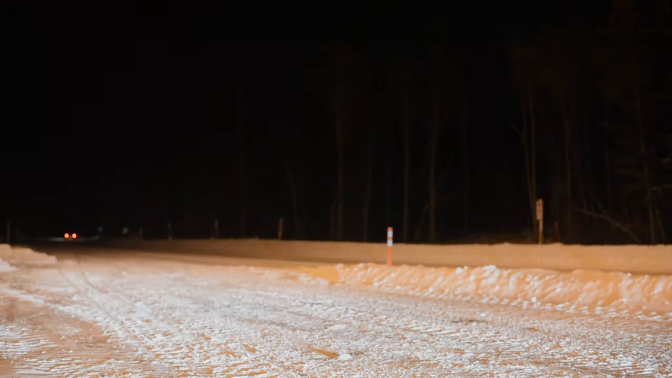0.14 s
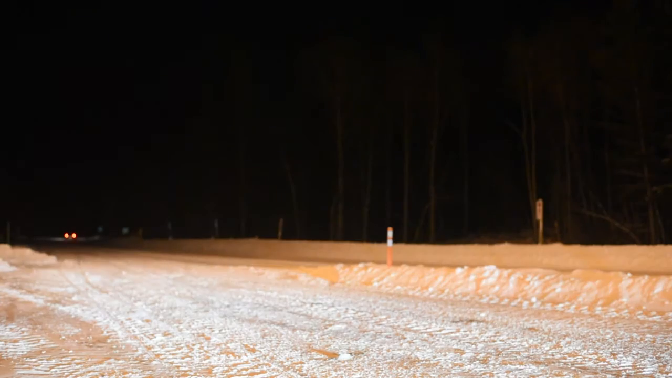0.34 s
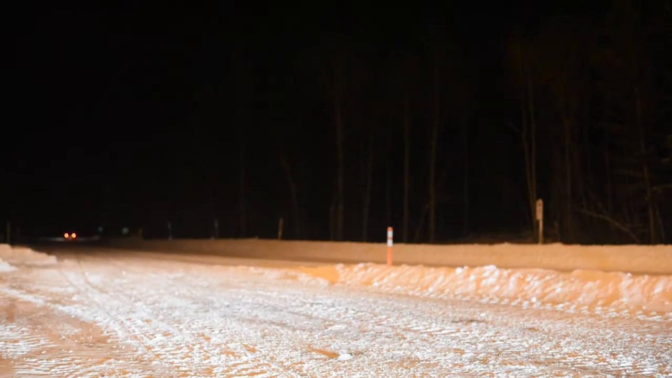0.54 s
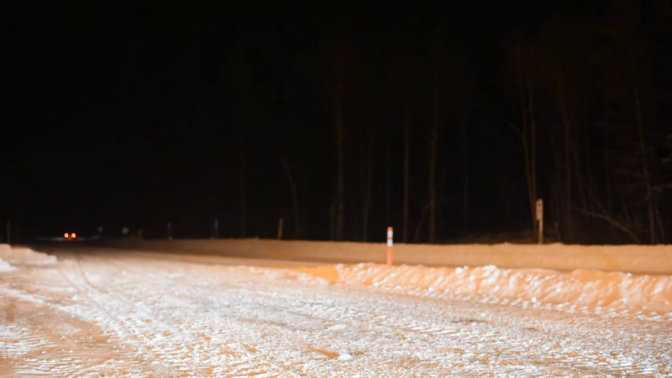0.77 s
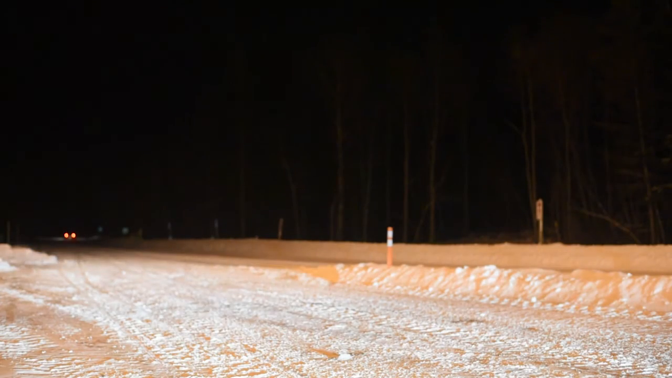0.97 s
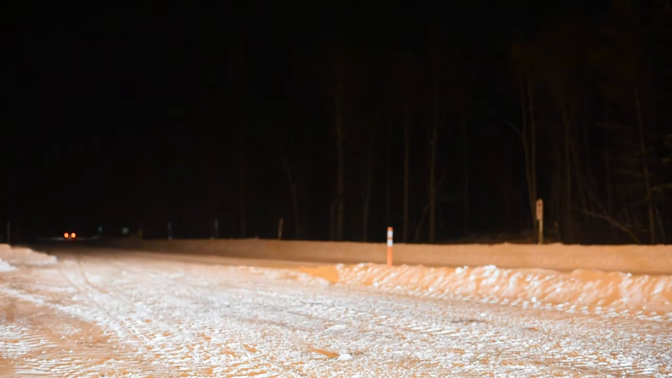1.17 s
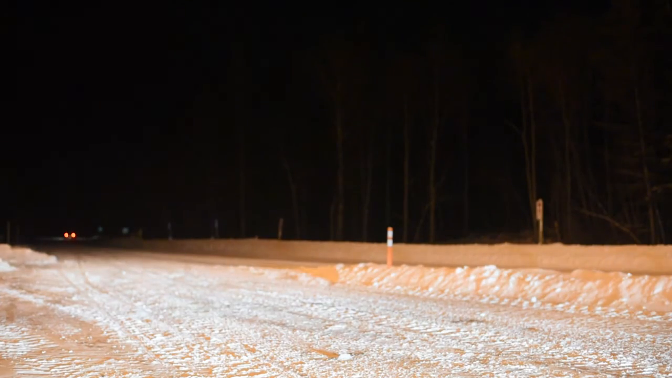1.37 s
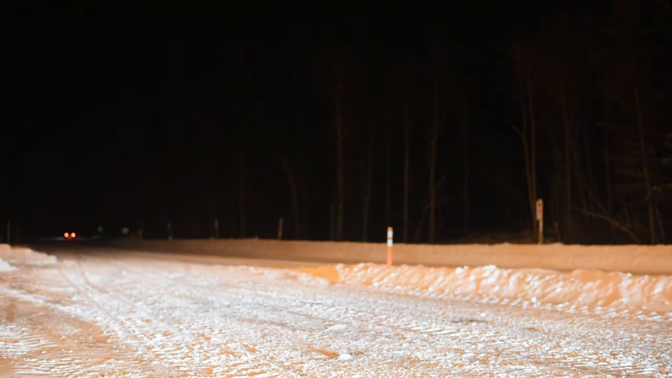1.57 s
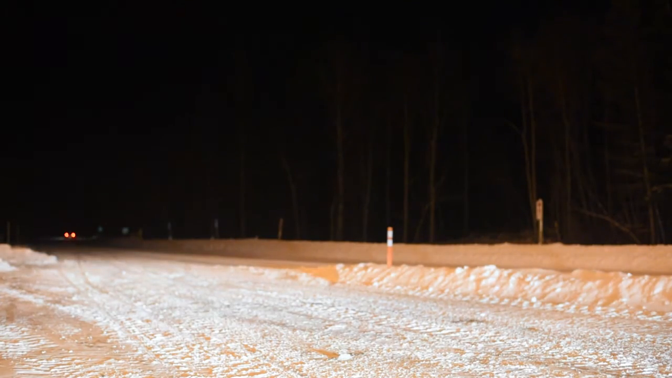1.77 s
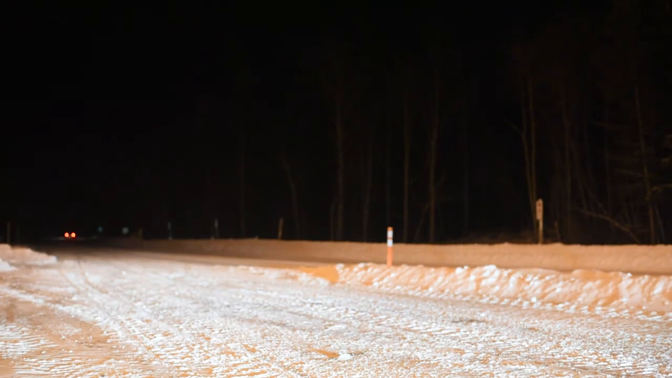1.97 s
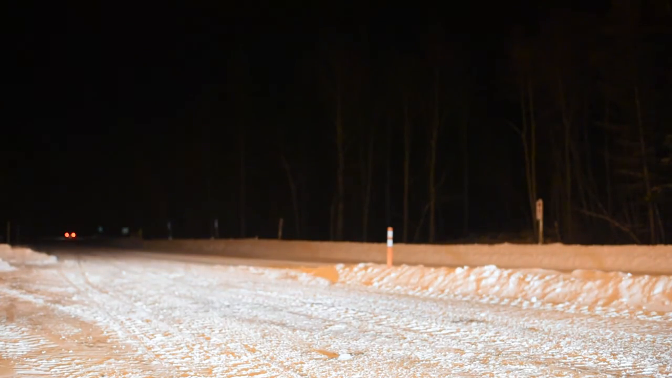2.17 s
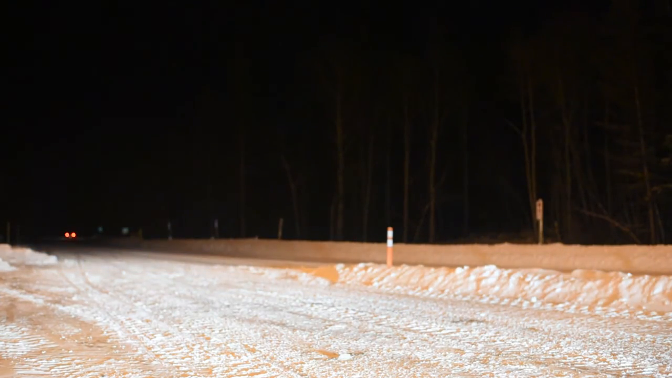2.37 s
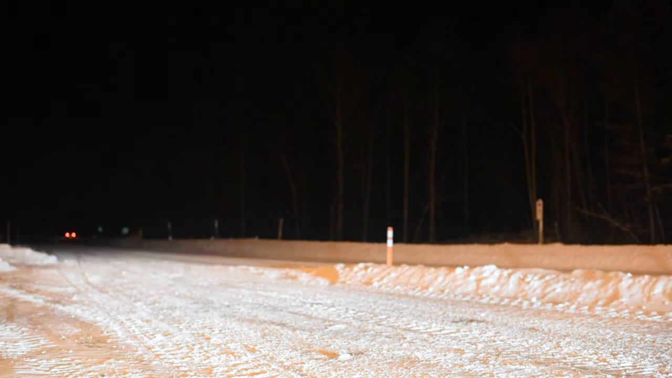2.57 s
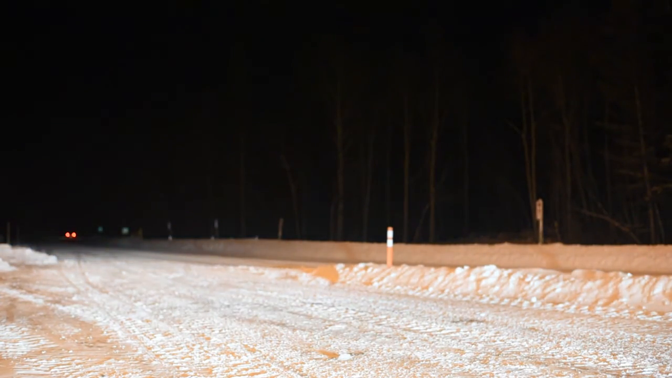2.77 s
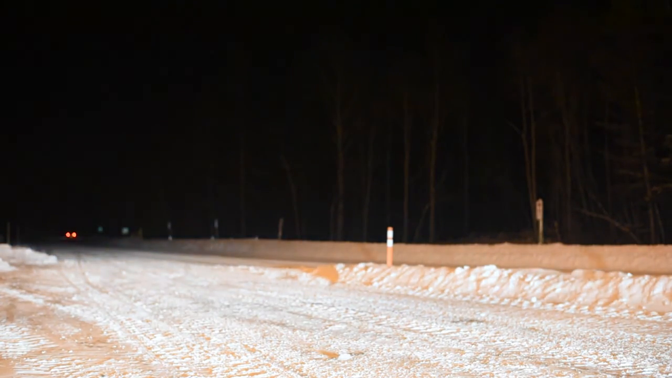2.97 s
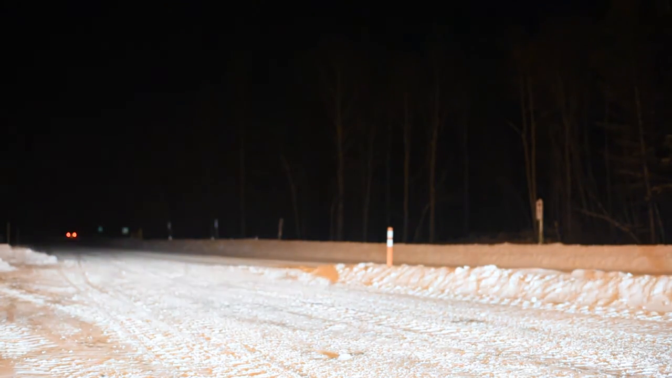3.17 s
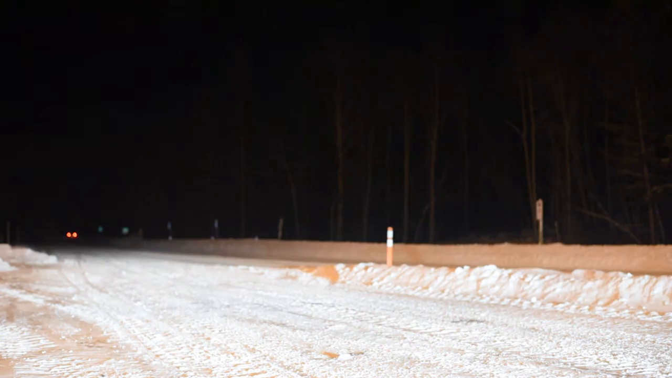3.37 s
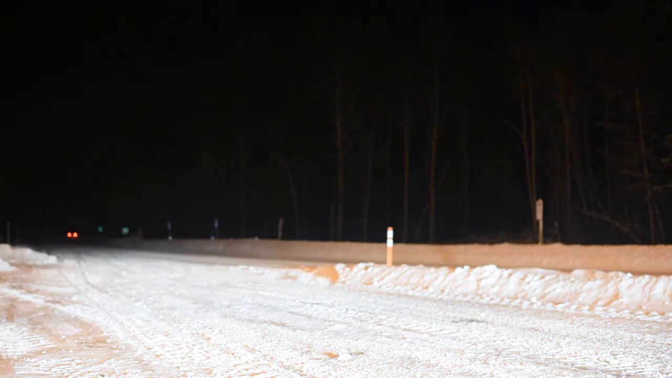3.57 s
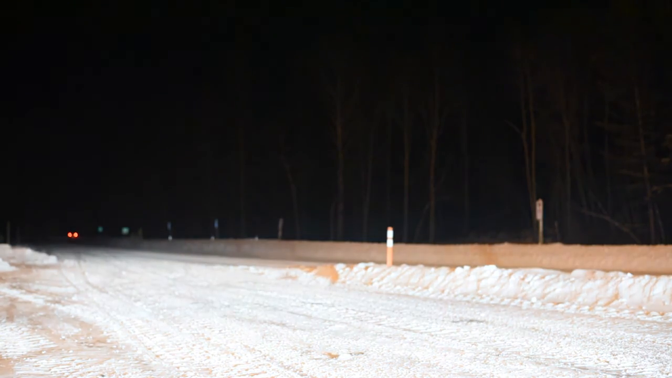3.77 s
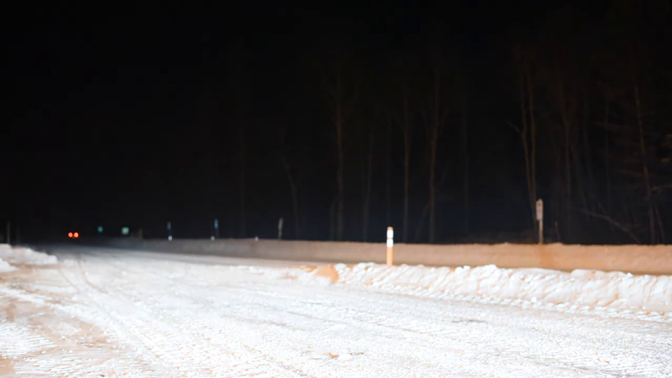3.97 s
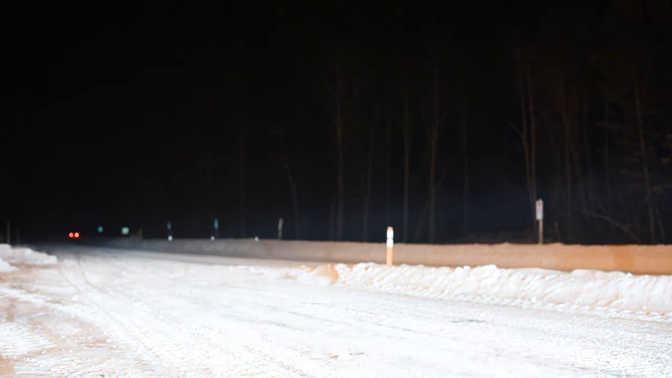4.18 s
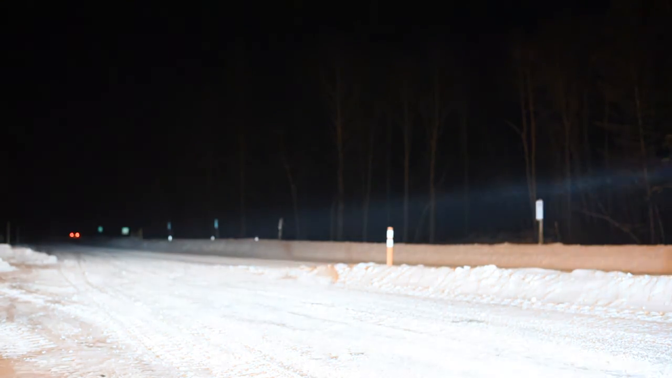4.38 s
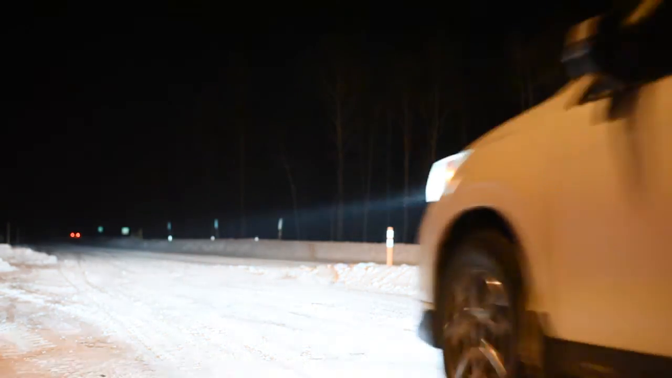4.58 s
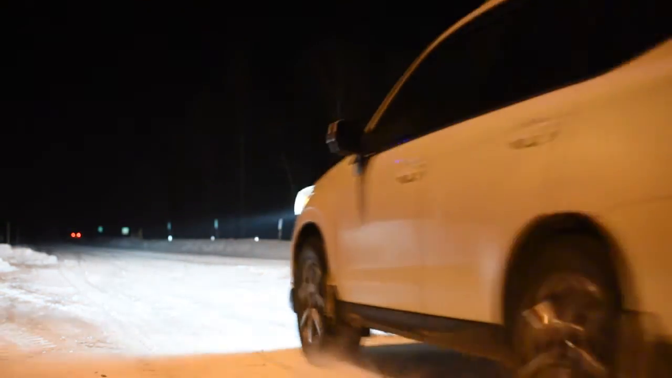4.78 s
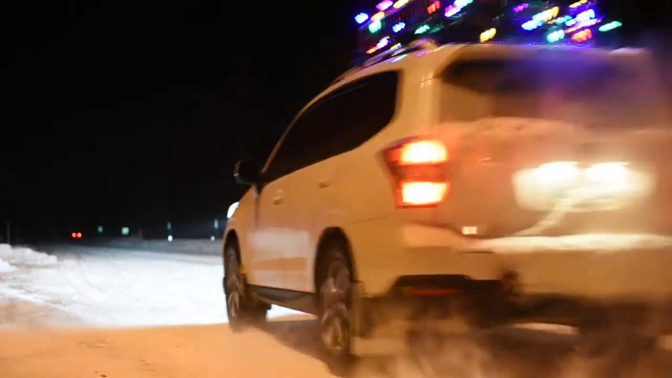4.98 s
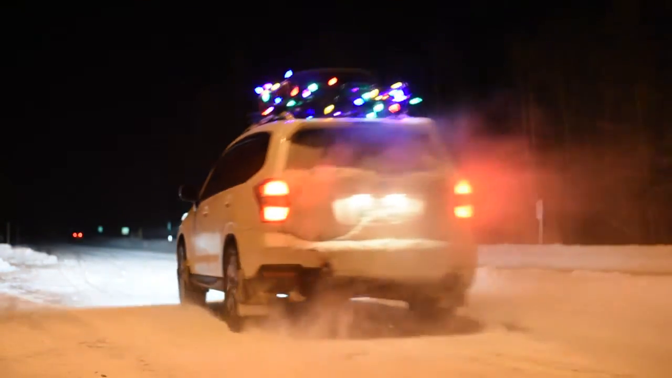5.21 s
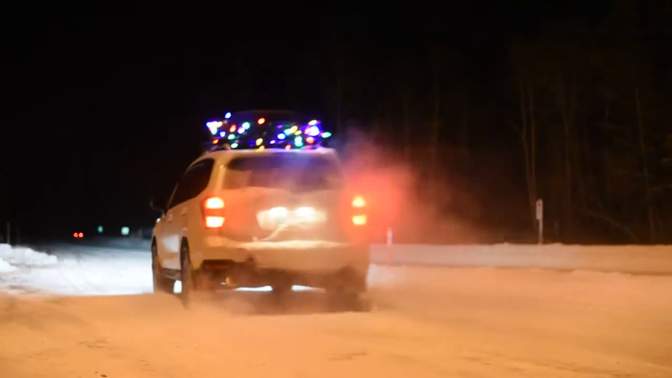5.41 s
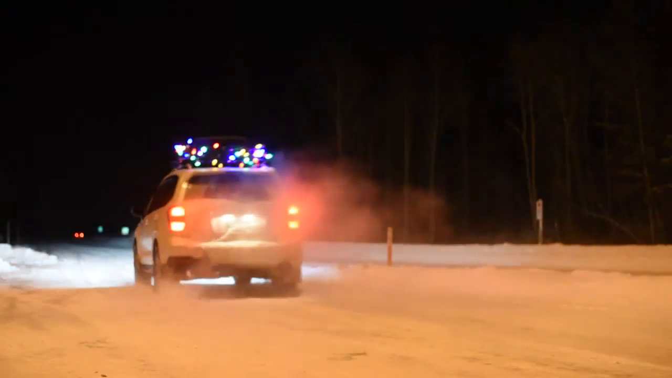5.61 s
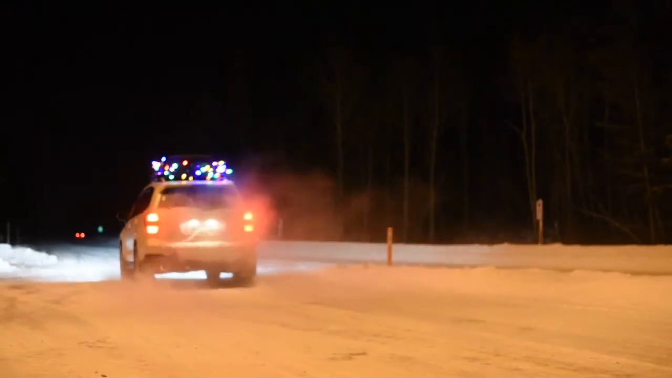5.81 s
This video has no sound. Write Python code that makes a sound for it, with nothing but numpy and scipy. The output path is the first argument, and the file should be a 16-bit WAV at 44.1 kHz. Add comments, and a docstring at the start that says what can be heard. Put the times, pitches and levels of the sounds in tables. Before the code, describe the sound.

A throaty four-cylinder exhaust climbs from a low throb, snow hiss and ice cracks swell beside the microphone, then a raspy bark recedes.

```python
"""A turbocharged four-cylinder car pulls away behind and to the right on packed snow, passes, drives off ahead.
The exhaust booms on multiples of the firing rate; sharp blows ring pipe modes as a bark, gas flow rushes.
Tyre roar and hiss are coloured noise; ice cracks and dry ticks are decaying sines; the turbine whistles.
A murmur of the night road lies beneath. Two microphone ports on a camera body hear the car's bearing."""
import sys
import numpy as np
from scipy import signal
from scipy.io import wavfile
from scipy.ndimage import uniform_filter1d

SR = 44100
rng = np.random.default_rng(int(sys.argv[2]) if len(sys.argv) > 2 else 0)


def inscribe(sig):
    """Save sig as 16-bit PCM at rate SR to the path in sys.argv[1].

    A 1-D sig is mono; a 2-D sig holds one channel per row.
    Samples are clipped to [-1, 1] before scaling.
    """
    pcm = np.round(np.clip(np.atleast_2d(sig).T, -1, 1) * 32767)
    wavfile.write(sys.argv[1], SR, pcm.astype(np.int16))


N = 257984

# car direction from the lens axis, positive to the right: (time [s], bearing [degrees])
BEARING = [(0, 159), (3.2, 150), (3.7, 137.5), (4.15, 106), (4.5, 41.5), (4.95, 29), (5.2, 4), (5.45, -5),
           (5.85, -9)]
PASS_S, LANE_M, M_PER_FIRING = 4.45, 3.02, 0.078  # abreast, lane distance, gearing
SOUND_M_PER_S = 343


def gain_of(db):
    """Decibels to amplitude."""
    return 10 ** (np.asarray(db) / 20)


def evened(x):
    """Scales to rms 1."""
    return x / np.sqrt(np.mean(x ** 2) + 1e-20)


def columns(rows, t):
    """Reads every column of a curve at the times t."""
    s, *rest = np.transpose(rows)
    return [np.interp(t, s, c) for c in rest]


def read(points, hz):
    """Reads every column of a spectrum on a log-frequency axis."""
    f, *rest = np.transpose(points)
    return [np.interp(np.log(hz + 1), np.log(f + 1), c) for c in rest]


def resonate(x, hz, width_hz):
    """Resonance at a moving pitch: shifts it down to zero, smooths with one pole, shifts back."""
    turn = np.exp(2j * np.pi * np.cumsum(hz * np.ones(len(x))) / SR)
    pole = np.exp(-np.pi * width_hz / SR)
    return 2 * (turn * signal.lfilter([1 - pole], [1, -pole], x / turn)).real


def noise(shape, patchy_db, flicker_db, size=512, slope_db=0, pivot_hz=1000):
    """Two unrelated noises of one colour, tilted about a pivot, sharing drifting patches and a wide flicker."""
    hop, hz = size // 4, np.fft.rfftfreq(size, 1 / SR)
    frames = N // hop + 5
    a, b, c, d, patches = rng.standard_normal((frames, len(hz), 5)).T
    patches = uniform_filter1d(patches, size=8, axis=0)  # across frequency
    patches = evened(uniform_filter1d(patches, size=20, axis=1))  # across time
    flicker = evened(uniform_filter1d(rng.standard_normal(frames), size=5))
    slope_db = np.resize(np.ones(N) * slope_db, frames * hop)[::hop]
    octaves = np.log2((hz[:, None] + 1) / pivot_hz)
    colour_db = read(shape, hz)[0][:, None] + slope_db * octaves
    gain = gain_of(colour_db + patchy_db * patches + flicker_db * flicker)
    z = np.array([a + 1j * b, c + 1j * d]) * gain
    return evened(signal.istft(z, nperseg=size, noverlap=size - hop)[1][:, :N])


def travel(turns, s):
    """Metres of road covered since the moment s; the wheels are geared to the engine."""
    return M_PER_FIRING * (turns - turns[round(s * SR)])


def distance(turns):
    """Metres from camera to car."""
    return np.hypot(travel(turns, PASS_S), LANE_M)


def firings(turns, pattern, uneven_db):
    """Strength of the current firing: the cylinder's own, plus chance."""
    # unequal runners, four blows in turn, scaled by pattern: (level [dB])
    cylinder_db = [0, -2, 2, -7.5]
    count = np.floor(turns).astype(int)
    chance = rng.standard_normal(count[-1] + 1)[count]
    return gain_of(pattern * np.take(cylinder_db, count % 4) + uneven_db * chance)


def boom(hz, turns, levels_db):
    """Exhaust boom: six multiples of the firing rate; they throb with uneven firings, less so at high revs."""
    # fourth to sixth multiple at 1 m, before waver and throb: (frequency [Hz], level [dB])
    pipe = [(90, -14), (120, -8.5), (150, -10.5), (190, -20), (240, -33), (330, -31), (410, -18.5),
            (500, -24.5), (600, -30), (700, -41)]
    waver_db, idle_hz, idle_db_per_hz = 1.5, 29.5, 1.2  # upper three only; below idle_hz the throttle is shut
    lag_turns, bend_turns = .07, .23  # the trough follows the blow; each higher multiple lags more
    waver = uniform_filter1d(rng.standard_normal((N // 512 + 1, 3)), size=12, axis=0)
    waver = np.repeat(waver, 512, axis=0)[:N].T
    waver = uniform_filter1d(evened(waver), size=1024, axis=1)
    loss_db = 20 * np.log10(distance(turns)) + idle_db_per_hz * np.maximum(idle_hz - hz, 0)
    upper_db = [read(pipe, (k + 4) * hz)[0] - loss_db + waver_db * w for k, w in enumerate(waver)]
    total = np.zeros(N)
    for k, db in enumerate(levels_db + upper_db):
        phase_turns = (k + 1) * (turns - lag_turns) - k * bend_turns
        total += gain_of(db) * np.cos(2 * np.pi * phase_turns)
    lumpy = np.minimum(45 / hz, .9)
    throb = firings(turns + .5, pattern=0.26 * lumpy, uneven_db=1.48 * lumpy)
    return -np.sqrt(2) * uniform_filter1d(throb, size=300) * total


def bark(t, hz, turns):
    """Each firing is a sharp blow that rings two pipe modes and an overtone, and spits a rasp of gas."""
    # bark of the two pipe modes: (time [s], low mode level [dB], high mode level [dB])
    mode_levels = [(0, -73, -80), (2, -54.5, -71), (3.3, -78, -44), (4.1, -31.5, -30.5), (4.45, -60, -29),
                   (4.65, -25, -24), (4.8, -34, -19), (4.9, -16, -23), (5.1, -19, -22), (5.4, -23.5, -22.5),
                   (5.6, -26.5, -26), (5.85, -27.5, -45)]
    tail_s, low_hz_per_m, low_min_hz, low_max_hz = 4.85, 75, 370, 604  # low mode: climbs as the tailpipe recedes
    high_base_hz, high_per_rev, high_from_hz = 688, 5.97, 103  # high mode: climbs with revs above high_from_hz
    low_db, high_db = columns(mode_levels, t)
    low_hz = low_min_hz + low_hz_per_m * abs(travel(turns, tail_s))
    low_hz = np.clip(low_hz, low_min_hz, low_max_hz)
    high_hz = high_base_hz + high_per_rev * np.maximum(hz - high_from_hz, 0)
    strength = firings(turns, pattern=0.75, uneven_db=1.2)
    blows = (np.diff(np.floor(turns), prepend=0) > 0) * strength / np.sqrt(hz)
    blows = blows - .22 * np.roll(blows, round(.0052 * SR))  # the open pipe end sends each blow back inverted
    low = evened(resonate(resonate(blows, low_hz, 140), low_hz, 290))
    high = evened(resonate(resonate(blows, high_hz, 130), high_hz, 200))
    overtone = evened(resonate(resonate(blows, 1.419 * high_hz, 110), 1.4 * high_hz, 360))
    spit = blows + .004 * strength * np.exp(-(turns % 1) / .2) * rng.standard_normal(N)
    rasp = spit
    for width_hz in (1500, 1500, 2200):
        rasp = resonate(rasp, 1200, width_hz)
    upper = gain_of(-14) * overtone + gain_of(-13) * evened(rasp)
    return gain_of(low_db) * low + gain_of(high_db) * (high + upper)


def exhaust_flow(hz, turns):
    """Nearly steady gas-flow noise, barely rippled by the firings, growing with revs and nearness."""
    # relative colour of the flow: (frequency [Hz], density [dB per Hz])
    colour = [(20, -39), (45, -49), (90, -1), (200, -1), (330, -5.5), (450, -4.5), (560, -6.5), (700, -16),
              (900, -21), (1400, -24.5), (3000, -53)]
    base_db, db_per_octave, near_share = -21.5, 5, 0.44  # at 1 m and 100 firings/s; share of the distance law
    level_db = base_db + db_per_octave * np.log2(hz / 100) - near_share * 20 * np.log10(distance(turns))
    ripple = evened(6.4 + np.exp(-(turns % 1) / 1.2))
    return gain_of(level_db) * ripple * noise(colour, patchy_db=1.8, flicker_db=.5, size=2048)


def tyres(t, turns):
    """Tyres roar and hiss on the snow: two noises, brighter with the wheels close, the hiss also ahead."""
    # (time [s], hiss level [dB], roar level above the hiss [dB])
    levels = [(0, -65, 8), (.6, -62.5, 8.5), (1.3, -58.5, 8.5), (1.62, -53.5, 9), (1.95, -52.5, 9.5),
              (2.5, -48.5, 6.5), (3.1, -44, 7), (3.5, -36.5, 6), (3.9, -30.5, 9), (4.19, -24.5, 6),
              (4.44, -28.5, 5.5), (4.54, -25.5, 4.5), (4.64, -28, 6.5), (4.74, -34, 8.5), (4.92, -31.5, 8),
              (5.02, -32.5, 8), (5.3, -35, 8), (5.55, -38, 5), (5.85, -41, 6.5)]
    # relative roar colour before tilt: (frequency [Hz], density [dB per Hz])
    roar_colour = [(60, -110), (300, -14), (500, -4), (800, -4.5), (1100, -3.5), (1600, -7), (2200, -6),
                   (2900, -12), (4000, -21.5), (7000, -51)]
    # relative hiss colour before tilt: (frequency [Hz], density [dB per Hz])
    hiss_colour = [(1200, -58), (2200, -47), (2900, -7.5), (3400, -3), (4000, -4.5), (4800, -1.5),
                   (5700, -4), (7300, -4), (9200, -3), (10300, -6), (11000, -10), (13000, -13.5),
                   (14500, -20.5), (15600, -27)]
    wheels_s, wheels_m = 4.334, 2.09  # front wheels closest, and over what stretch of road
    hiss_db, roar_db = columns(levels, t)
    beside = np.exp(-(travel(turns, wheels_s) / wheels_m) ** 4)
    ahead = .5 + .5 * np.cos(np.radians(columns(BEARING, t)[0]))
    roar_slope_db = -3.5 + 7.5 * beside  # slopes in dB per octave
    hiss_slope_db = -5 + 5.5 * ahead + 2 * beside
    roar = noise(roar_colour, patchy_db=0.76, flicker_db=1.23, slope_db=roar_slope_db, pivot_hz=1480)
    hiss = noise(hiss_colour, patchy_db=.7, flicker_db=1.1, slope_db=hiss_slope_db, pivot_hz=6000)
    return gain_of(hiss_db) * (gain_of(roar_db) * roar + hiss)


def road_murmur():
    """Steady low murmur of the night road: coloured noise with drifting patches."""
    # relative colour of the murmur: (frequency [Hz], density [dB per Hz])
    colour = [(24, -34), (40, -32), (102, 1.5), (376, -7), (442, 1.5), (590, -30), (623, -31), (658, -37),
              (802, -14), (1910, -19), (3000, -37), (3900, -72), (6600, -120)]
    return gain_of(-44) * noise(colour, patchy_db=1.8, flicker_db=0.0, size=2048)


def snaps(rows, decay_cycles):
    """Single clicks: sines with a soft start, decaying by 1/e in the given number of cycles."""
    out, u = np.zeros(N), np.arange(400) / SR
    for s, db, hz in rows:
        swell = (1 - np.exp(-u / 8e-5)) * np.exp(-u * hz / decay_cycles)
        click = swell * np.sin(2 * np.pi * hz * u)
        out[round(s * SR):][:400] += gain_of(db + 2.5) * click  # 2.5 dB offsets the loss in the swell
    return out


def dry_ticks():
    """Dry ticks near the camera: short high rings."""
    # (time [s], approximate peak [dB], pitch [Hz])
    tick_rows = [(0.8375, -26.5, 5400), (1.0246, -44, 4860)]
    return snaps(tick_rows, decay_cycles=1.5)


def ice_cracks():
    """Ice cracking under the tyres: heavily damped low rings."""
    # (time [s], approximate peak [dB], pitch [Hz])
    crack_rows = [(2.121, -22, 757), (2.307, -23, 1062), (2.474, -16, 1189), (2.591, -17.5, 1071),
                  (2.981, -12, 1265), (3.688, -7, 972)]
    return snaps(crack_rows, decay_cycles=.65)


def turbo_whistle(t):
    """Turbine whistle: a thin sine on a boost-driven pitch curve, slightly fuzzy from random pitch waver."""
    # (time [s], pitch before waver [Hz], level [dB]); silent before the first row
    whistle = [(3.6, 9100, -70), (4.05, 10080, -45), (4.22, 10360, -45), (4.35, 10600, -60),
               (4.55, 10900, -50), (4.75, 10450, -51), (4.92, 10300, -62), (5.1, 10370, -49),
               (5.6, 10140, -53), (5.85, 9900, -58)]
    hz, db = columns(whistle, t)
    waver_hz = 25 * evened(uniform_filter1d(rng.standard_normal(N), size=300))
    tone = np.sqrt(2) * np.sin(2 * np.pi * np.cumsum(hz + waver_hz) / SR)
    return gain_of(db) * (t > whistle[0][0]) * tone


def road_echo(hz, t, turns):
    """Once the tail end has passed, its inverted echo off the road draws bands that climb with distance."""
    tail_s, near_m, heights_m2 = 4.6, 1.606, 1.627  # tail passes, how near, twice the product of the heights
    depth_db, low_hz, high_hz = 2.5, 845, 3550
    along_m = np.interp(t, np.arange(N) / SR, travel(turns, tail_s))
    late_s = heights_m2 / np.hypot(along_m, near_m) / SOUND_M_PER_S
    band = np.exp(-(low_hz / (hz + 1)) ** 2 - (hz / high_hz) ** 2)[:, None]
    comb = np.cos(2 * np.pi * hz[:, None] * late_s)
    return gain_of(-2 * depth_db * band * np.clip(along_m, 0, 1) * comb)


def ports(pair, turns):
    """Path difference and shading by the camera body turn with the bearing; treble arrives partly scattered."""
    # camera body at full shading: (frequency [Hz], left minus right [dB], left lead [radians])
    body = [(278, 6, -0.43), (810, -4, 0.34), (1300, -4.5, -0.5), (2130, -4, -0.044), (2360, 0.5, -1.22),
            (3150, -7, 0.079), (4730, -9.5, -1.16), (6140, -7, -0.48), (8500, -7.5, -1.8),
            (10000, -11, -1.3), (14000, -7.5, -1.9)]
    spacing_mm, shade_deg = 74.2, 41  # port spacing, bearing of full shading
    like_far, wide_s, wide_m = .85, 4.643, 4.6  # treble likeness, lost while the car fills the view
    hz, t, (a, b) = signal.stft(pair, SR, nperseg=512, noverlap=384)
    degrees, = columns(BEARING, t)
    path_m = spacing_mm / 1000 * np.sin(np.radians(degrees))
    shade = np.clip(degrees / shade_deg, 0, 1)
    along_m = np.interp(t, np.arange(N) / SR, travel(turns, wide_s))
    like = np.clip(like_far * (1 - np.exp(-(along_m / wide_m) ** 2)), 0, 1)
    tilt_db, lead = (v[:, None] * shade for v in read(body, hz))
    lead = lead - 2 * np.pi * hz[:, None] * path_m / SOUND_M_PER_S
    same = 1 - (1 - like) * (1 - np.exp(-hz[:, None] / 3500))
    half = gain_of(tilt_db / 2) * np.exp(.5j * lead)  # half the difference goes to each port
    left = half * a
    right = (same * a + np.sqrt(1 - same ** 2) * b) / half
    z = np.array([left, right]) * road_echo(hz, t, turns)
    return signal.istft(z, SR, nperseg=512, noverlap=384)[1][:, :N]


def scene():
    """The boom reaches both ports alike; the rest comes through the bearing."""
    # (time [s], firing rate [Hz], boom level before throb of multiples 1, 2, 3 [dB, dB, dB])
    engine = [(0.0, 24.57, -70, -67, -47), (0.24, 22.6, -68, -55, -46), (0.63, 35.14, -50, -37, -31.5),
              (0.81, 40.06, -48, -36, -29.5), (1.11, 41.46, -43, -36, -28), (1.37, 50.1, -41, -26.5, -31),
              (1.55, 58.95, -34, -19.5, -30.5), (1.7, 62.2, -38, -18.5, -29),
              (2.02, 65.25, -32.5, -18.5, -30.5), (2.33, 74.56, -29.5, -21.5, -38.5),
              (2.72, 82.14, -28, -26.5, -44), (3.05, 87.1, -22, -26.5, -33),
              (3.26, 93.1, -18.5, -24.5, -31), (3.45, 99.04, -13.5, -29.5, -30.5),
              (3.7, 105.2, -14.5, -24.5, -40), (4.02, 109, -15, -24, -37), (4.14, 108.4, -14, -28, -35),
              (4.35, 111.8, -12.5, -25.5, -49), (4.43, 113.3, -16.5, -22, -40), (4.5, 116, -14, -17.5, -27),
              (4.61, 113.2, -16, -13.5, -30.5), (4.72, 111.0, -22, -14.5, -28.5),
              (4.84, 106.7, -15, -15, -39), (4.97, 99.55, -14, -33.5, -22.5),
              (5.12, 96.1, -14, -19.5, -28.5), (5.36, 96.8, -16.5, -15.5, -27),
              (5.51, 93.86, -18.5, -19, -23.5), (5.77, 85.9, -21, -17.5, -22), (5.85, 85.1, -25, -15, -27)]
    t = np.arange(N) / SR
    hz, *levels_db = columns(engine, t)
    turns = np.cumsum(hz) / SR  # one turn per firing
    rush = exhaust_flow(hz, turns) + tyres(t, turns) + road_murmur()
    points = bark(t, hz, turns) + dry_ticks() + ice_cracks() + turbo_whistle(t)
    pair = rush + points * np.array([[1], [0]])  # points have no scattered part
    return boom(hz, turns, levels_db) + ports(pair, turns)


def record(dry):
    """The input stage rounds off peaks; the side signal is high-passed, so bass is mono; then the band limit."""
    left, right = 1.3 * np.tanh(dry / 1.3)
    mid, side = (left + right) / 2, (left - right) / 2
    side_highpass = signal.firwin(801, 500, pass_zero=False, fs=SR)
    side = signal.oaconvolve(side, side_highpass, "same")
    both = np.array([mid + side, mid - side])
    band_limit = signal.firwin(511, 15650, window=("kaiser", 9), fs=SR)
    return signal.oaconvolve(both, band_limit[None], "same")


dry = scene()
out = record(dry)
inscribe(out)
```